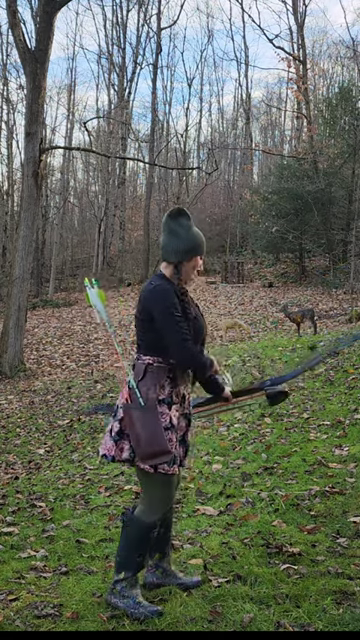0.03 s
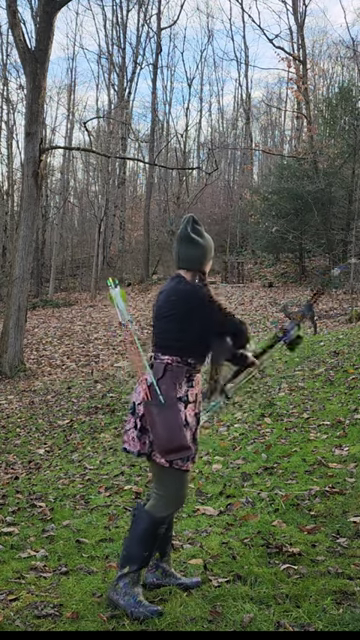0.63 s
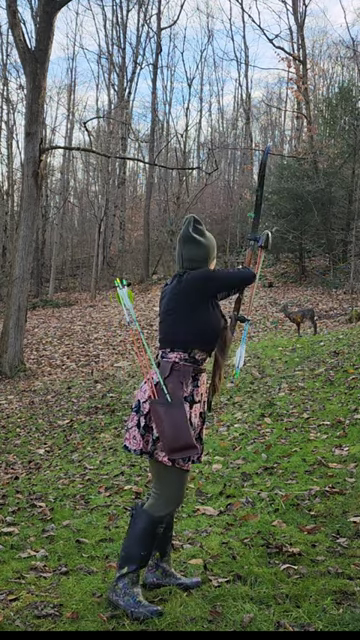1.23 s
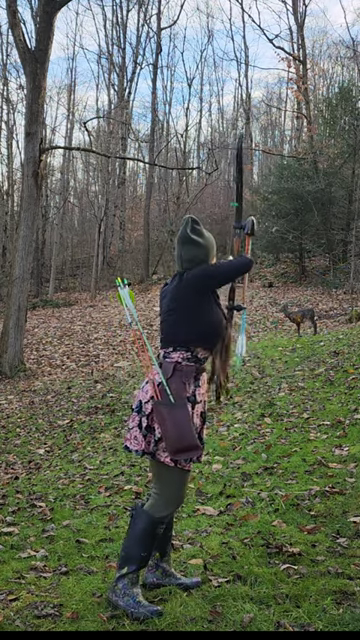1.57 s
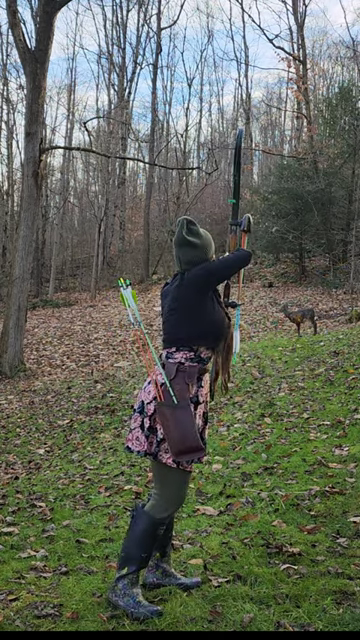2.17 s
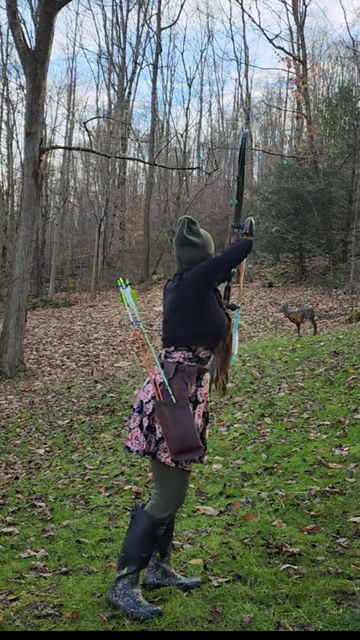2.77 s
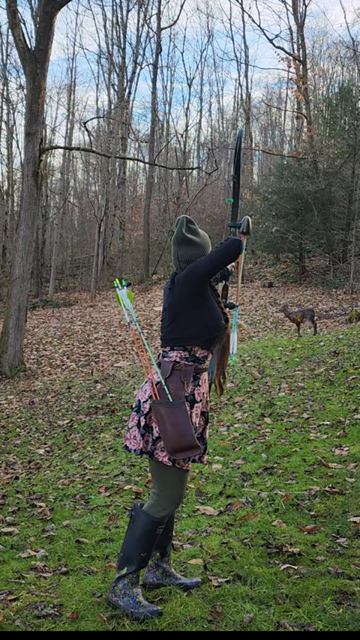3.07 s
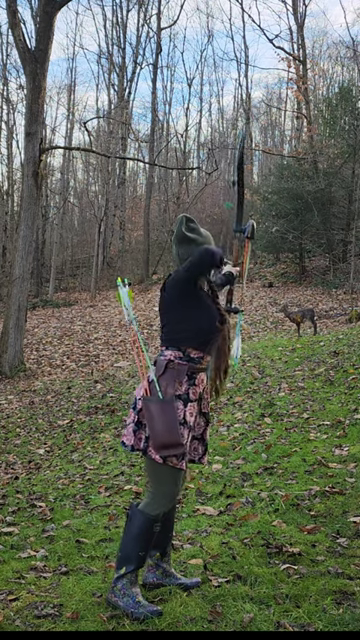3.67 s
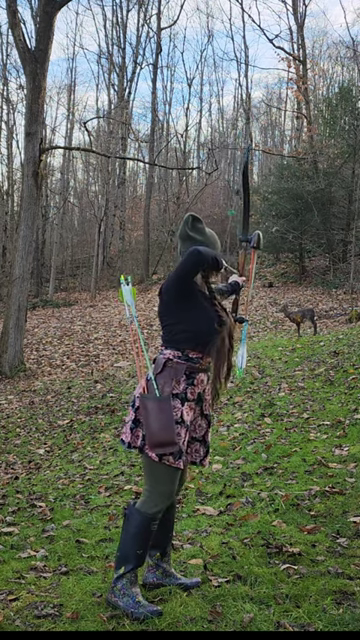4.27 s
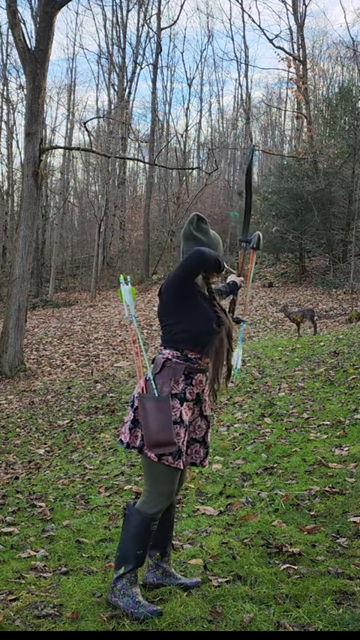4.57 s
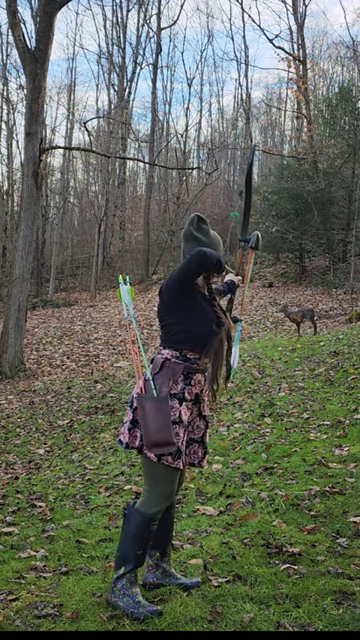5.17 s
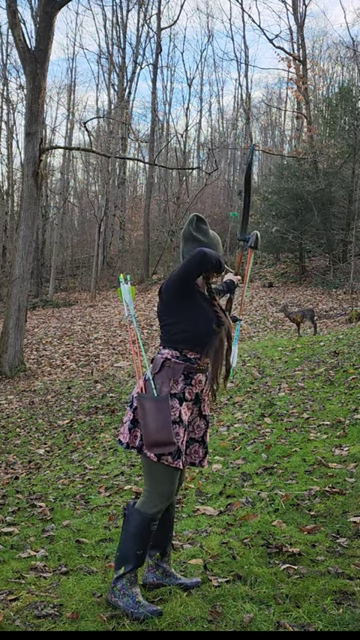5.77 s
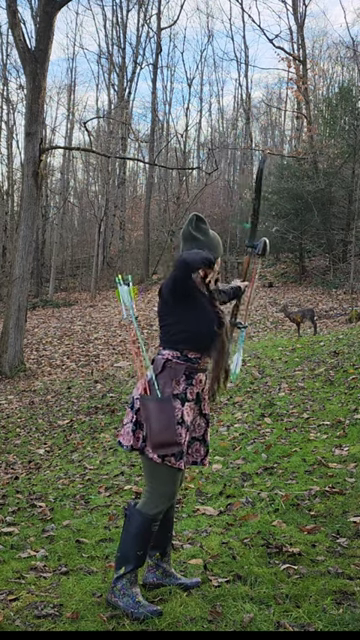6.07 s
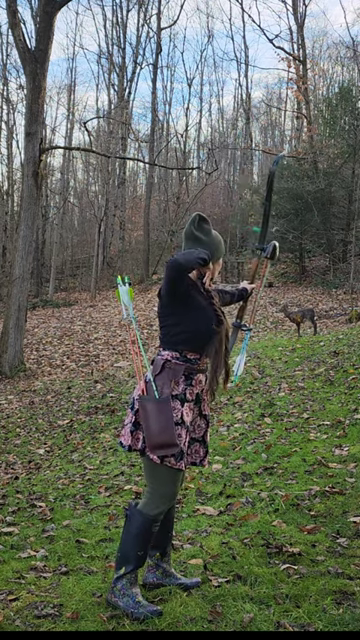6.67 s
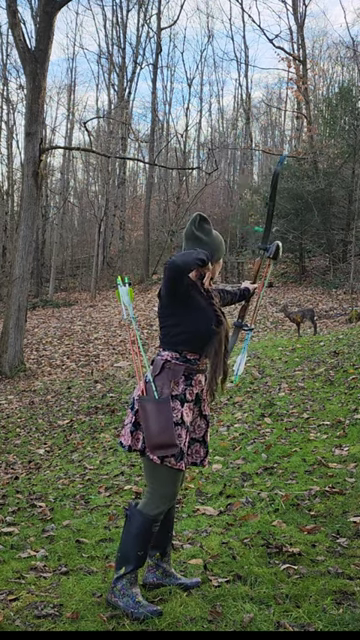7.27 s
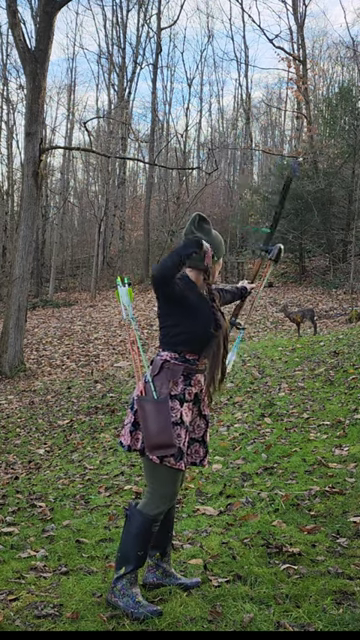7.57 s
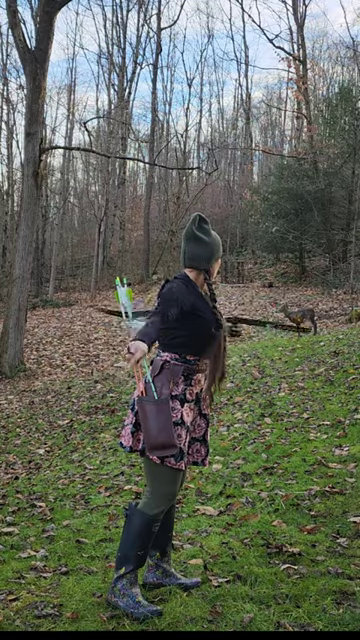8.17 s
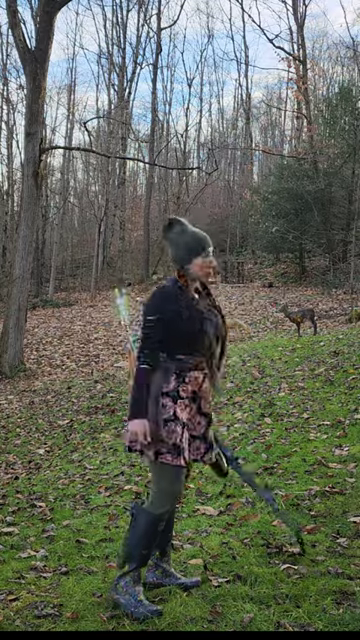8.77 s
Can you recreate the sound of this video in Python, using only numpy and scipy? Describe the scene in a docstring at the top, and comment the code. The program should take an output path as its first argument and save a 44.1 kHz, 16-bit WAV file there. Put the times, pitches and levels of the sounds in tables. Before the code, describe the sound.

A low, distant rumble and soft outdoor hiss run throughout, swelling slightly at about 1.5 seconds, with a faint far engine fading over the first few seconds. A small bird chips briefly near 1 second. From about 0.5 to 5.5 seconds come scattered faint ticks, light knocks of gear and thin creaks as a bow is handled and drawn a few metres away. At 6 seconds the string releases with a sharp snap and clack, by far the loudest sound, leaving a short low hum and a slight ring. At about 6.3 seconds the arrow hits a foam target with a quieter knock and dull thud. The trees answer with a brief echo. The bird chips again near 7.8 seconds, gear clicks softly just after 8 seconds, and at about 9 seconds a rubber boot brushes through leaves with a tiny squeak.

```python
"""One arrow at the wood's edge

A phone on a lawn, a few metres from an archer with a recurve bow. Far off, a rumble, an engine and a
bird; nearer, thin ticks and soft taps, gear knocking and the bow creaking as it is drawn. The arrow
rasps and slaps along the bow, the string hums, the point knocks into a foam target and the trees answer.
At the end a rubber boot turns in the leaves and squeaks."""
import sys
import numpy as np
from scipy import signal
from scipy.fft import rfft, irfft, next_fast_len
from scipy.io import wavfile
from scipy.ndimage import uniform_filter1d

SR = 44100
rng = np.random.default_rng(int(sys.argv[2]) if len(sys.argv) > 2 else 0)


def generate_wav(sig):
    """Save sig (samples, or channels by samples) to the path in sys.argv[1] as 16-bit PCM at SR."""
    pcm = np.round(np.clip(np.atleast_2d(sig).T, -1, 1) * 32767).astype(np.int16)
    wavfile.write(sys.argv[1], SR, pcm)


N = 397341
TIME = np.arange(N) / SR

# How alike the two microphones hear noise. Each row: frequency in Hz, likeness from 0 to 1.
LIKENESS = [(25, .93), (60, .96), (130, .88), (290, .72), (640, .5), (1410, .25), (3100, .1), (15000, .04)]
# The right microphone favours the upper mids, the left the treble.
# Each row: frequency in Hz, left minus right in dB at full strength.
MIC_BALANCE = [(300, .5), (1300, 0), (2400, -10), (4400, -5), (5800, 3), (7900, 10), (10000, 6), (15000, 8)]

# Open air over the lawn. Each row: frequency in Hz, relative level in dB.
AIR_SPECTRUM = [(20, -6), (70, 0.01), (120, -9), (190, -23), (350, -18.5), (600, -26), (950, -30),
                (1300, -30), (2100, -33), (3100, -33), (4300, -41), (6000, -43), (9500, -51), (12500, -47),
                (15500, -50)]
# The distant rumble swells. Each row: time of the crest in seconds, lift in dB.
RUMBLE_SWELLS = [(1.57, 5), (8.65, 2.5)]
# The far engine. Levels in dB of its second and third orders.
ENGINE_ORDERS_DB = [-69, -69]
# Returns from trunks and the wood's edge. Each row: delay in seconds, level in dB, spread in seconds.
ECHOES = [(.208, -27.5, .0032), (.44, -36, .05)]
# Tone of the near scatter, the deep wood and the first echo. Each row: frequency in Hz, gain in dB.
NEAR_COLOUR = [(100, -10.5), (400, -2.5), (2750, 1.5), (3200, 6.5), (3800, 2.5), (15000, 0)]
FAR_COLOUR = [(100, -12.5), (500, -6.5), (1500, -2), (2800, 0), (3200, 7.5), (3800, 1.5),
              (5500, -2.5), (8000, -8.5), (15000, -12.5)]
ECHO_COLOUR = [(300, -11.5), (1500, -0.5), (4500, 6), (8000, 0), (15000, -1)]
# A small bird in the wood. Each row: start in seconds, level in dB.
BIRD_CHIPS = [(.996, -50), (4.925, -66), (7.796, -53.5)]

# Thin, high, narrow ticks and soft, low taps. Each row: start in seconds, level in dB.
HIGH_TICKS = [(0.6825, -53), (1.537, -56), (2.417, -52.5), (3.037, -57), (3.096, -54), (3.3895, -54),
              (4.6934, -55.5), (8.2244, -55.5), (8.5654, -55)]
LOW_TAPS = [(0.493, -52.5), (7.256, -56.5), (8.269, -56.5), (8.867, -55.5)]
# Light knocks of gear and thin creaks of the bow. Each row: start in seconds, level in dB, pitch in Hz.
GEAR_KNOCKS = [(0.579, -54, 3270), (0.7352, -54, 2880), (3.6556, -52, 3330), (3.7444, -57.5, 2420),
               (5.3443, -51, 3030), (7.9164, -65, 3766), (8.1988, -59, 2360), (8.2257, -58, 3350),
               (8.2911, -56, 2380)]
BOW_CREAKS = [(0.6479, -69, 10900), (2.095, -49, 10000), (2.4074, -62, 7650), (2.6698, -67, 8500),
              (2.8823, -59.5, 11100), (3.2216, -63.5, 9200), (3.912, -68, 8580), (4.2216, -64, 7600),
              (4.5014, -63, 7900)]
# Sleeves brush and a boot sweeps. Each row: fastest moment in seconds, level in dB.
SLEEVE_MOVES = [(.11, -73), (.6, -75), (.73, -73.5), (1.39, -77.5)]
BOOT_MOVES = [(8.985, -55)]
# Brushed cloth and leaves underfoot. Each row: frequency in Hz, relative level in dB.
CLOTH_SPECTRUM = [(600, -9), (1500, -6), (3000, 5.5), (5000, -7), (8000, -8.5), (15000, -20)]
LEAF_SPECTRUM = [(400, -22), (1100, -3.5), (1600, -8), (2200, 2.5), (3100, 1), (4500, -6), (6500, -11),
                 (8500, -10), (10500, -30), (14000, -21), (16000, -45)]
# The rubber's squeak. Relative levels in dB of its harmonics, from the first up.
SQUEAK_HARMONICS_DB = [-6.5, -0.5, -4.5, -13]

# The arrow enters the target, then its shaft whips. Each row: start in seconds, knock in dB, rise in
# seconds, crunch in dB, crunch t60 in seconds, treble tilt in dB per octave, thud in dB.
TARGET_STRIKES = [(6.3413, -24, 0.0011, -42, 0.054, 2.5, -39),
                  (6.3641, -44, 0.0024, -45.5, 0.13, -0.5, -38)]
# Modes of the lodged shaft and the foam. Each row: frequency in Hz, relative level in dB, t60 in seconds.
SHAFT_MODES = [(1111, -22, 0.028), (2393, -7, 0.015), (2546, -4.5, .011), (2840, -4, 0.015)]
FOAM_MODES = [(118, -6, 0.071), (149.7, 1, 0.087), (267.3, -7, 0.058), (396, -7.5, 0.046),
              (452, -13.5, 0.063)]
# Tearing foam. Each row: frequency in Hz, relative level in dB.
CRUNCH_SPECTRUM = [(300, -13.5), (700, -7), (1200, 5.5), (3000, 9.5), (5000, 1.5), (9000, -7.5),
                   (16000, -14)]

# String, arrow and bow touch during the shot.
# Each row: start in seconds, level in dB, rise in seconds, t60 in seconds, treble tilt in dB per octave.
BOW_CONTACTS = [(5.9796, -41, .007, .03, -1.5), (5.9904, -21, .0006, 0.035, -2),
                (5.9940, -17.5, .003, 0.071, -1), (6.0069, -21, .0008, .012, 4.5),
                (6.0130, -11, .0003, .026, -0.5), (6.025, -28, .001, 0.016, 2)]
# Those contacts heard through shaft and riser. Each row: frequency in Hz, relative level in dB.
CLACK_SPECTRUM = [(150, -30.5), (400, -4), (800, -9.5), (1200, -6), (2100, -1), (3200, -0.5), (4500, -4.5),
                  (6300, -10), (7900, -7), (9300, -15.5), (12500, -14.5), (16000, -22)]
# Air pushed as the string leaves the fingers, the limbs spring, the string snaps taut, the shaft slaps.
# Each row: centre in seconds, frequency in Hz, level in dB, half length in seconds.
AIR_PUSHES = [(5.9931, 688, -12, 0.00085), (6.0005, 430, -25, 0.0026), (6.0094, 165, -17, 0.0017),
              (6.0138, 2540, -12, 0.00018)]
# Modes of shaft and fittings, and of string and limbs.
# Each row: frequency in Hz, level in dB, t60 in seconds.
FITTING_MODES = [(2360, -35, 0.14), (2375, -39.5, .15), (2550, -37, 0.1), (2839, -37.5, 0.1),
                 (2980, -40, .25), (3240, -40, .33), (3330, -36, .2), (3450, -39.5, .18),
                 (3570, -37.5, .15), (3790, -35.5, 0.11), (4380, -50.5, 0.32), (5012, -45, .13),
                 (6135, -43.5, .12), (7704, -43, .13), (7840, -23.5, 0.016), (10337, -41, 0.057)]
STRING_MODES = [(48.5, -52, 0.54), (75, -27, 0.11), (97, -34.5, 0.87), (145, -29, 0.38), (177.8, -29, 0.13),
                (193, -42, .2), (230, -39.5, 0.23), (285.6, -32, 0.17), (317, -38, 0.11), (385, -51, .2),
                (468, -51, .2)]


def undb(db):
    """Decibels to gain."""
    return 10 ** (np.asarray(db) / 20)


def unit(x):
    """Scale to an rms of one."""
    return x / np.sqrt(np.mean(x ** 2))


def along(points, hz):
    """Read (Hz, value) points on a log-frequency axis."""
    point_hz, value = np.transpose(points)
    return np.interp(np.log(hz), np.log(point_hz), value)


def tilted(points, tilt, corner_hz=1500):
    """A spectrum made brighter by a hard contact or duller by a soft one."""
    return lambda hz: along(points, hz) + tilt * np.log2(np.maximum(hz / corner_hz, 1))


def colour(x, db_at):
    """Filter by a gain in dB given as a function of frequency."""
    n = x.shape[-1]
    size = next_fast_len(n + 2048)
    hz = np.maximum(np.fft.rfftfreq(size, 1 / SR), 1)
    return irfft(rfft(x, size) * undb(db_at(hz)), size)[..., :n]


def noise(n, db_at):
    """Coloured stereo noise of rms one, alike in the bass and unrelated in the treble."""
    mid, side = rng.standard_normal((2, n))
    mid = colour(mid, lambda hz: db_at(hz) + 10 * np.log10(1 + along(LIKENESS, hz)))
    side = colour(side, lambda hz: db_at(hz) + 10 * np.log10(1 - along(LIKENESS, hz)))
    return unit(np.array([mid + side, mid - side]))


def blow(rise, t60, length_s=1):
    """Envelope of a blow: a straight rise, then an exponential decay."""
    t = TIME[:int(length_s * SR)]
    return np.minimum(t / rise, 1) * np.exp(-np.log(1000) * np.maximum(t - rise, 0) / t60)


def burst(rise, t60, db_at):
    """A short scrape or crack: coloured noise under a blow's envelope."""
    envelope = blow(rise, t60, length_s=.25)
    return envelope * noise(len(envelope), db_at)


def ring(modes, rise):
    """Damped modes set going by one push."""
    return sum(undb(db) * blow(rise, t60) * np.sin(2 * np.pi * hz * TIME[:SR]) for hz, db, t60 in modes)


def wander(rate_hz):
    """A smooth random drift of rms one."""
    hold = int(SR / rate_hz)
    steps = np.repeat(rng.standard_normal(N // hold + 1), hold)
    return unit(uniform_filter1d(uniform_filter1d(steps, hold), hold)[:N])


def waver(n, depth):
    """A pitch factor that trembles quickly around one."""
    return 1 + depth * unit(uniform_filter1d(rng.standard_normal(n), size=40))


def add(out, start, x):
    """Mix x into out, from a start in seconds."""
    i = int(start * SR)
    out[:, i:i + x.shape[-1]] += x[..., :N - i]


def tick(hz, octaves, t60, skirt_db=46):
    """A tiny snap around one resonance, peak near one."""
    def resonance_db(f):
        octaves_off = np.abs(np.log2(f / hz)) + 1e-6
        return -skirt_db / (1 + (2 * octaves / octaves_off) ** 2)

    envelope = blow(.0014, t60, length_s=.05)
    centre = rng.standard_normal(len(envelope))
    sides = .7 * rng.standard_normal((2, len(envelope)))
    snap = colour(envelope * (centre + sides), resonance_db)
    return snap / np.abs(snap.mean(axis=0)).max()


def ticks(rows, pan_db, octaves, t60):
    """Play (s, dB, Hz) rows as ticks of one kind; a positive pan puts them to the left."""
    out = np.zeros((2, N))
    side_db = np.array([[pan_db], [-pan_db]]) / 2
    for start, db, hz in rows:
        add(out, start, undb(db + side_db) * tick(hz, octaves, t60))
    return out


def patter(count, hz, db, spread_octaves, range_db=10):
    """Rows (s, dB, Hz) of faint ticks at random moments, most of them tiny."""
    return [(when * N / SR, db + range_db * size ** 4, hz * 2 ** (spread_octaves * (pitch - .5)))
            for when, size, pitch in rng.uniform(0, 1, (count, 3))]


def rustle(moves, spectrum, grain_db, swell_db_per_s=117, fade_db_per_s=104):
    """Cloth or leaves brushing: a grainy swish that swells to each move's fastest moment and dies."""
    swell = sum(undb(db - np.maximum(swell_db_per_s * (crest - TIME), fade_db_per_s * (TIME - crest)))
                for crest, db in moves)
    grain = unit(undb(grain_db * wander(500)))
    return swell * grain * noise(N, lambda hz: along(spectrum, hz))


def microphones(x, strength):
    """Each microphone colours the sound in its own way, most of all from straight ahead."""
    left = colour(x[0], lambda hz: strength * along(MIC_BALANCE, hz) / 2)
    right = colour(x[1], lambda hz: -strength * along(MIC_BALANCE, hz) / 2)
    return np.array([left, right])


def air(level_db=-62, rumble_hz=105, swell_s=.11):
    """Open air: a smooth hiss over a distant rumble that flutters and swells."""
    bed = undb(level_db) * noise(N, lambda hz: along(AIR_SPECTRUM, hz))
    rumble = colour(bed, lambda hz: -10 * np.log10(1 + (hz / rumble_hz) ** 8))
    swell_db = sum(db * np.exp(-.5 * ((TIME - crest) / swell_s) ** 2) for crest, db in RUMBLE_SWELLS)
    flutter_db = .8 * wander(10)
    return bed + rumble * (undb(swell_db + flutter_db) - 1)


def engine(turn_hz=41.3, fade_from_s=1.6, fade_db_per_s=14):
    """Far off, an engine drones unsteadily on two orders, then fades."""
    phase = 2 * np.pi * np.cumsum(turn_hz * (1 + .025 * wander(25))) / SR
    fade_db = fade_db_per_s * np.maximum(TIME - fade_from_s, 0)
    return sum(undb(db - fade_db + 2 * wander(14)) * np.sin(order * phase)
               for order, db in enumerate(ENGINE_ORDERS_DB, start=2))


def wood(x, near_db=-17, near_t60=.38, far_db=-20, far_t60=.93):
    """Ground and near trunks scatter briefly; the deep wood answers longer and duller."""
    t = TIME[:2 * SR]

    def scatter(envelope, db, points):
        returns = envelope * rng.standard_normal((2, len(t))) / np.sqrt(np.sum(envelope ** 2))
        return undb(db) * colour(returns, lambda hz: along(points, hz))

    response = scatter(blow(.0084, near_t60, length_s=2), near_db, NEAR_COLOUR)
    response += scatter(blow(.03, far_t60, length_s=2), far_db, FAR_COLOUR)
    for (delay, db, spread), points in zip(ECHOES, (ECHO_COLOUR, FAR_COLOUR)):
        response += scatter(np.exp(-.5 * ((t - delay) / spread) ** 2), db, points)
    return signal.fftconvolve(x, response, axes=1)[:, :N]


def bird(high_hz=5750, low_hz=4550, fall_s=.0048):
    """Back in the trees a bird chips: each a brief, husky whistle that drops in pitch."""
    out = np.zeros((2, N))
    envelope = blow(.0022, .027, length_s=.1)
    glide_hz = low_hz + (high_hz - low_hz) * np.exp(-TIME[:len(envelope)] / fall_s)
    for start, db in BIRD_CHIPS:
        phase = 2 * np.pi * np.cumsum(glide_hz * waver(len(envelope), depth=.035)) / SR
        add(out, start, undb(db) * envelope * np.sin(phase))
    return out


def small_ticks(tick_hz=5600, tap_hz=1280):
    """Around the microphones, thin, high, narrow ticks and soft, low taps over a faint patter."""
    high = [(start, db, tick_hz) for start, db in HIGH_TICKS]
    high += patter(count=260, hz=tick_hz, db=-75, spread_octaves=.03, range_db=11)
    thin = patter(count=65, hz=6600, db=-75, spread_octaves=.03)
    low = [(start, db, tap_hz) for start, db in LOW_TAPS]
    low += patter(count=200, hz=tap_hz, db=-72, spread_octaves=.45, range_db=8)
    return (ticks(high, pan_db=-4.5, octaves=.13, t60=.02)
            + ticks(thin, pan_db=0, octaves=.1, t60=.02)
            + ticks(low, pan_db=1, octaves=.22, t60=.031))


def handling():
    """A few metres off, gear knocks, the bow creaks and sleeves brush as the archer moves."""
    faint = patter(count=70, hz=2600, db=-73, spread_octaves=.8)
    knocks = ticks(GEAR_KNOCKS + faint, pan_db=-5, octaves=.3, t60=.03)
    creaks = ticks(BOW_CREAKS, pan_db=1, octaves=.4, t60=.033)
    return knocks + creaks + rustle(SLEEVE_MOVES, CLOTH_SPECTRUM, grain_db=3)


def boot(squeak_at_s=8.969, squeak_length_s=.039, squeak_db=-53, slip_hz=870, slip_hz_per_s=12500):
    """A boot sweeps through leaves; its rubber sticks and slips ever faster, never quite evenly."""
    out = rustle(BOOT_MOVES, LEAF_SPECTRUM, grain_db=2.5)
    t = TIME[:int(squeak_length_s * SR)]
    slip_rate = (slip_hz + slip_hz_per_s * t) * waver(len(t), depth=.03)
    phase = 2 * np.pi * np.cumsum(slip_rate) / SR
    squeak = sum(undb(db) * np.sin(k * phase) for k, db in enumerate(SQUEAK_HARMONICS_DB, start=1))
    add(out, squeak_at_s, undb(squeak_db) * np.hanning(len(t)) * squeak)
    return out


def target(thud_lag_s=.0061):
    """Down the lawn the point knocks the shaft and tears into foam; the heavy body thuds just after."""
    out = np.zeros((2, N))
    for start, knock_db, rise, crunch_db, t60, tilt, thud_db in TARGET_STRIKES:
        add(out, start, undb(knock_db) * ring(SHAFT_MODES, rise))
        add(out, start, undb(crunch_db) * burst(rise / 2, t60, tilted(CRUNCH_SPECTRUM, tilt)))
        add(out, start + thud_lag_s, undb(thud_db) * ring(FOAM_MODES, rise=.0043))
    return out


def bow(taut_at_s=6.0095):
    """Straight ahead the string slips, drives the arrow rasping past the riser, snaps taut and hums."""
    out = np.zeros((2, N))
    for start, db, rise, t60, tilt in BOW_CONTACTS:
        add(out, start, undb(db) * burst(rise, t60, tilted(CLACK_SPECTRUM, tilt)))
    t = TIME[:SR // 10] - .05  # time either side of a push's centre
    for centre, hz, db, half_length in AIR_PUSHES:
        push = -np.exp(-.5 * (t / half_length) ** 2) * np.cos(2 * np.pi * hz * t)
        add(out, centre + t[0], undb(db) * push)
    hardest_at_s = max(BOW_CONTACTS, key=lambda row: row[1])[0]
    add(out, hardest_at_s, ring(FITTING_MODES, rise=.00085))
    add(out, taut_at_s, ring(STRING_MODES, rise=.0025))
    return out


def scene(small_send_db=.5, bird_send_db=6):
    """From the phone's spot: shot and hit ahead, small sounds around, the wood and the air beyond."""
    shot = bow() + target()
    footwork = boot()
    chips = bird()
    small_sounds = small_ticks() + handling()
    # The bird sits deep among the trees, so more of it comes back from them.
    answer = wood(shot + undb(small_send_db) * small_sounds + undb(bird_send_db) * chips)
    ahead = microphones(shot + footwork, strength=.92)
    beyond = microphones(answer, strength=.36) + microphones(air() + engine(), strength=.25)
    return ahead + small_sounds + chips + beyond


def record(dry, bottom_hz=18, top_hz=15500):
    """The phone cuts the deepest bass and the top."""
    low_cut = signal.butter(2, bottom_hz, "high", fs=SR, output="sos")
    high_cut = signal.ellip(10, .2, 80, top_hz, fs=SR, output="sos")
    return signal.sosfilt(high_cut, signal.sosfilt(low_cut, dry))


dry = scene()
out = record(dry)
generate_wav(out)
```